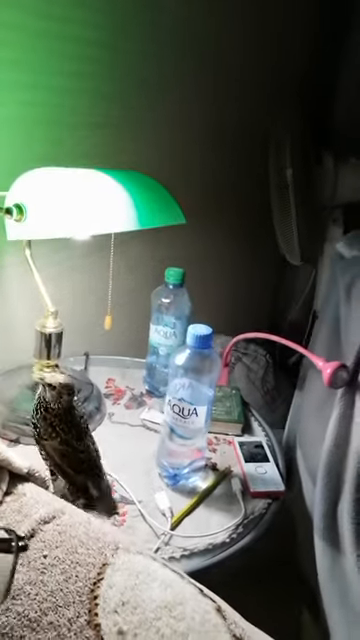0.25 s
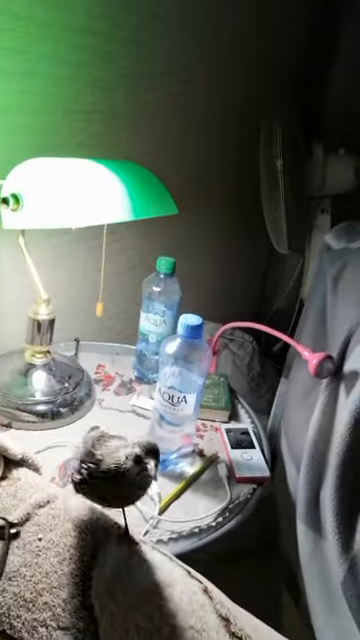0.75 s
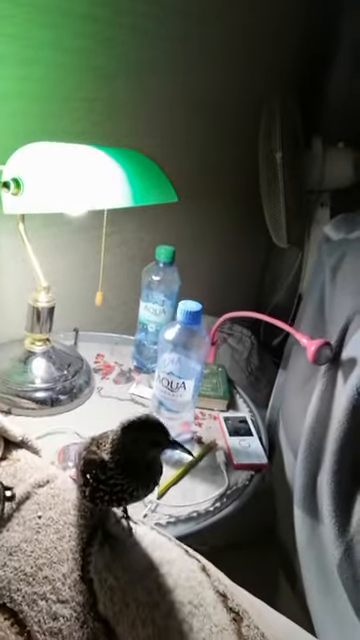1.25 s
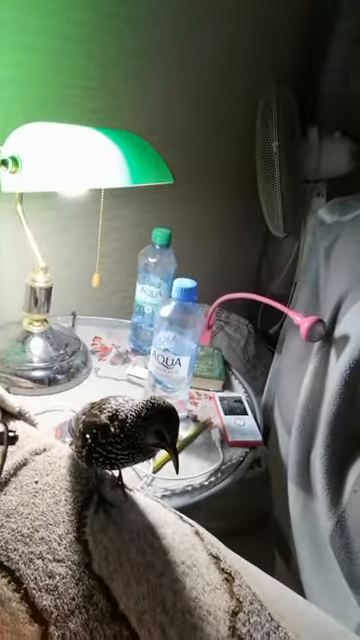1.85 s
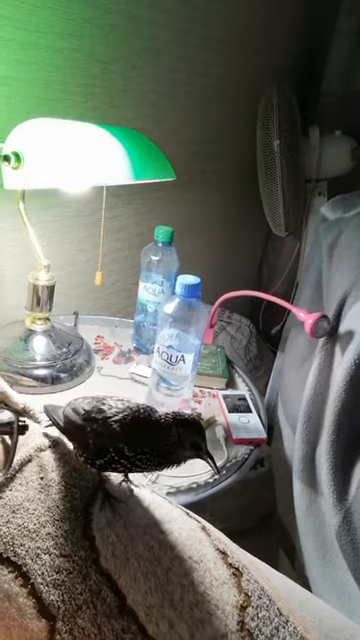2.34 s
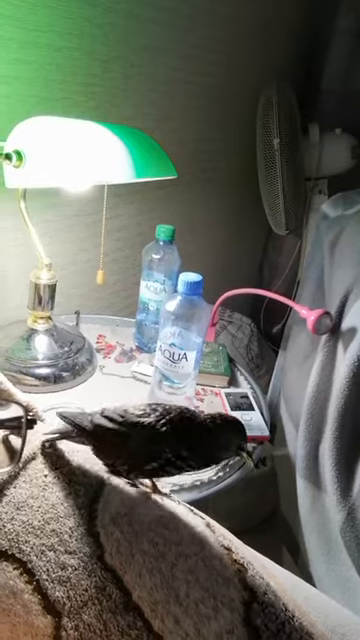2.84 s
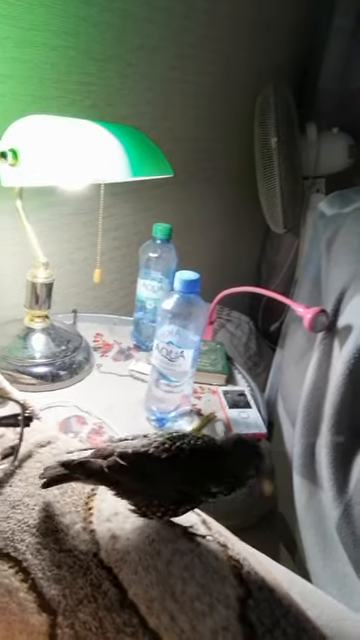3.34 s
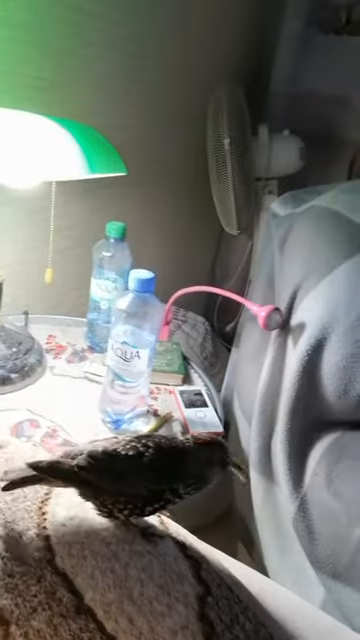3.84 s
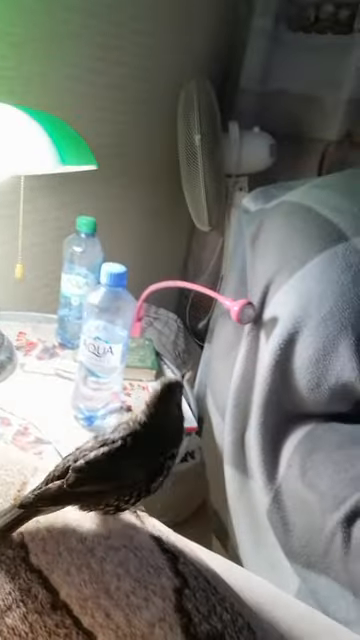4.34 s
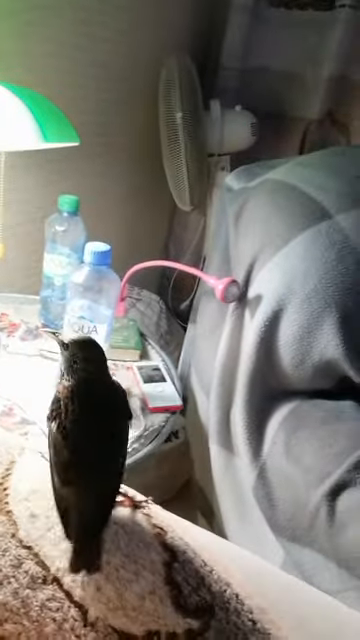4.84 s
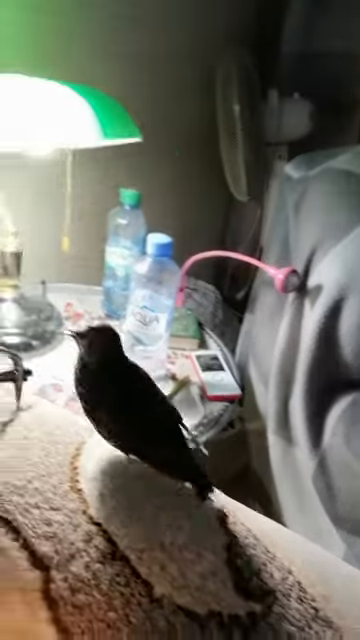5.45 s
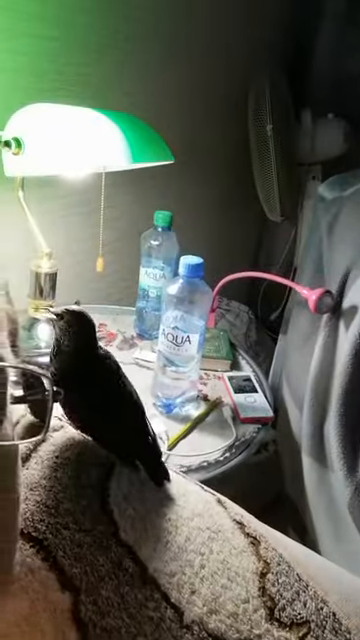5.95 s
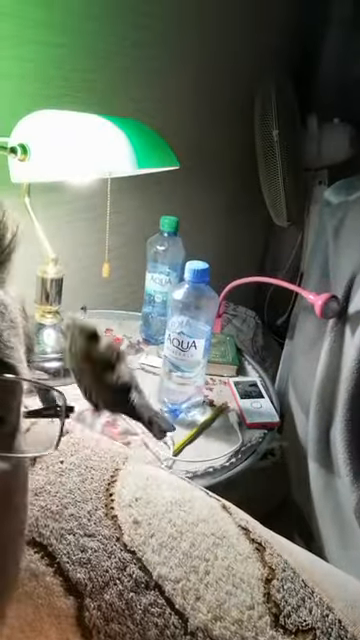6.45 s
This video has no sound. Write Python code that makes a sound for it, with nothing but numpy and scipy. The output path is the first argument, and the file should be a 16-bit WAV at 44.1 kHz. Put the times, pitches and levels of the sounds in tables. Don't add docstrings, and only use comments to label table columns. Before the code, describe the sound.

A starling sings very close to a phone in a small furnished bedroom. A quick train of falling clicky chirps opens, followed by hissy, wheezy breaths. Two clear whistles slide down and sag, then a rattle of rising chirps leads into a fast jumble of slurs, pips, squeaks and brief buzzes. Another faint chirp train comes later, and the end thins to airy wheeze. Short room reverberation, with soft fan rush and hum behind; the bird sounds stronger on the left.

```python
import sys
import numpy as np
from scipy import signal
from scipy.fft import rfft, irfft, next_fast_len
from scipy.io import wavfile
from scipy.ndimage import uniform_filter1d, map_coordinates

SR = 44100
rng = np.random.default_rng(int(sys.argv[2]) if len(sys.argv) > 2 else 0)


def convert_level_to_amplitude(level_db):
    exponent = np.asarray(level_db, float) / 20
    return 10 ** exponent


def inscribe(sig):
    pcm = np.round(np.clip(np.atleast_2d(sig).T, -1, 1) * 32767)
    wavfile.write(sys.argv[1], SR, pcm.astype(np.int16))


N = 295459


def unit(x):
    return x / np.sqrt(np.mean(x ** 2, axis=-1, keepdims=True) + 1e-20)


def along(points, hz):
    f, v = np.transpose(points)
    return np.interp(np.log(hz + 1), np.log(f + 1), v)


def curves(rows):
    s, *columns = np.transpose(rows)
    t = np.arange(N) / SR
    return [np.interp(t, s, column) for column in columns]


def wobble(rate):
    return map_coordinates(rng.standard_normal(N // 20), [np.arange(N) * rate / SR])


def filtered(x, response):
    m = next_fast_len(N + SR // 2)
    spectrum = rfft(x, m) * response(np.fft.rfftfreq(m, 1 / SR))
    return irfft(spectrum, m)[..., :N]


def resonant(x, modes):
    def response(f):
        total = 0
        for k, (centre, width, db) in enumerate(modes):
            damping = 1j * f * width
            total = total + (-1) ** k * convert_level_to_amplitude(db / 2) * damping / (centre ** 2 - f ** 2 + damping)
        return total ** 2
    return filtered(x, response)


def patchy(depth_db):
    z = signal.stft(rng.standard_normal(N + 512), nperseg=256)[2]
    field = uniform_filter1d(rng.standard_normal(z.shape), 2, 0)
    field = uniform_filter1d(field, 14, 1)
    return signal.istft(z * convert_level_to_amplitude(depth_db * field / field.std()), nperseg=256)[1][:N]


def song():
    out = np.zeros(N)
    rough = np.where(np.arange(N) < 2 * SR, .35, 1)
    waver = 1 + .009 * rough * wobble(150)
    flutter = np.clip(1 + .15 * wobble(35) + .4 * rough * wobble(170), .25, 1.4)
    for note in whistles() + strokes() + pips():
        brief = note[-1][0] - note[0][0] < .024
        add(out, note, .0012, waver, convert_level_to_amplitude(6.5) * (np.ones(N) if brief else flutter), 0)
    knocks = chirps(out, waver)
    hoarse(out, waver)
    return out + knocks


# f/Hz, level/dB
OVERTONE_LEVELS = [(1500, -16), (3000, 9.5), (5600, -39), (8300, -7.5), (10500, -29), (14000, -68)]


def add(out, rows, edge, waver, flutter, rich_db):
    s, hz, db = np.transpose(rows)
    at = np.arange(round((s[0] - edge) * SR), min(round((s[-1] + edge) * SR), N))
    t = at / SR
    pitch = uniform_filter1d(np.interp(t, s, hz), size=70) * waver[at]
    phase = 2 * np.pi * np.cumsum(pitch) / SR
    second = convert_level_to_amplitude(along(OVERTONE_LEVELS, 2 * pitch) + rich_db) * np.sin(2 * phase)
    third = convert_level_to_amplitude(along(OVERTONE_LEVELS, 3 * pitch) + rich_db - 35) * np.sin(3 * phase)
    ramp = np.clip(np.minimum(t - t[0], t[-1] - t) / (2 * edge), 0, 1)
    gain = convert_level_to_amplitude(np.interp(t, s, db)) * flutter[at] * np.sin(np.pi / 2 * ramp) ** 2
    out[at] += gain * (np.sin(phase) + second + third)


# t/s, length/s, f/Hz, level/dB
WHISTLES = [
    (1.344, .176, 2793, -21),
    (1.665, 0.22, 2739, -19.5),
]


def whistles():
    from_hz, slide_s, slide_db = 3340, 0.051, -17
    sag_hz_per_s, wane_db_per_s = 459, 48.5
    notes = []
    for s, length, hz, db in WHISTLES:
        notes.append([
            (s, from_hz, db + slide_db),
            (s + 0.28 * slide_s, 0.39 * from_hz + .6 * hz, db - 8.5),
            (s + slide_s, hz, db),
            (s + length, hz - sag_hz_per_s * length, db - wane_db_per_s * length)])
    return notes


# t/s, length/s, start f/Hz, end f/Hz, level/dB
DROPS = [(2.367, .018, 1345, 646, -35.5), (2.488, 0.028, 6460, 3840, -39), (2.752, 0.017, 4500, 1984, -24),
         (2.846, 0.019, 3490, 2257, -23), (3.086, .014, 3030, 1765, -36), (3.119, 0.0088, 3620, 2460, -28),
         (3.284, 0.021, 4510, 3090, -30), (3.318, 0.0084, 3870, 3380, -22), (3.36, .015, 3304, 2365, -25),
         (3.886, 0.015, 5760, 4600, -30), (3.903, 0.0081, 5060, 4170, -25.5),
         (3.929, 0.014, 4570, 2350, -28), (3.946, 0.0094, 3140, 1675, -30), (4.272, .016, 3640, 1867, -31),
         (4.392, .006, 3100, 2450, -26), (5.138, 0.02, 6140, 4090, -28.5), (5.18, 0.0086, 3440, 2360, -27),
         (5.2, .016, 3068, 1715, -42.5), (5.284, .016, 3370, 2780, -25.5),
         (5.654, 0.0064, 1525, 870, -44.5), (5.792, 0.0052, 3550, 2510, -24.5),
         (5.808, 0.0046, 3120, 2200, -27.5)]
CLIMBS = [(2.385, .033, 648, 1100, -37), (2.415, 0.016, 7170, 7900, -33), (2.513, 0.017, 3820, 4230, -30),
          (2.551, 0.032, 3710, 3870, -23), (2.736, 0.023, 3900, 4660, -45),
          (2.772, 0.017, 1960, 2874, -23.5), (2.805, 0.013, 3010, 3860, -27.5),
          (2.862, 0.033, 2270, 2884, -27), (3.127, 0.035, 2400, 3500, -26.5),
          (3.176, 0.024, 3980, 4300, -41), (3.201, 0.036, 2420, 2893, -24.5),
          (3.303, 0.012, 3160, 3900, -28), (3.375, .02, 2412, 2880, -26.5), (3.912, 0.021, 4140, 4560, -31),
          (3.941, 0.0063, 2410, 3140, -17), (3.962, 0.036, 2804, 3400, -24.5),
          (4.29, .047, 2450, 3440, -23.5), (4.411, 0.016, 2514, 3440, -29.5),
          (5.19, .006, 2350, 3330, -20.5), (5.216, 0.045, 1920, 3580, -20), (5.827, .033, 2490, 3334, -23),
          (5.66, 0.033, 872, 1100, -45)]
HOLDS = [(1.523, 0.04, 2957, 2880, -31.5), (2.429, 0.056, 7830, 6350, -36.5),
         (2.43, 0.027, 1223, 1350, -43), (2.533, 0.022, 4200, 3750, -29), (2.788, 0.017, 2873, 3040, -16),
         (2.821, .078, 2066, 2093, -35.5), (3.166, 0.025, 2020, 1930, -40.5),
         (3.324, 0.024, 3340, 3377, -22.5), (3.338, .033, 1975, 1834, -39.5),
         (3.395, 0.026, 2906, 2580, -27.5), (4.001, 0.022, 3400, 3274, -24),
         (4.009, 0.029, 2350, 2200, -33.5), (4.041, .064, 2793, 2430, -34), (4.337, .027, 3435, 3364, -25),
         (4.354, 0.018, 2097, 2123, -30.5), (4.398, 0.015, 2430, 2530, -25.5),
         (5.157, 0.034, 4020, 4240, -28), (5.273, 0.029, 1965, 2030, -44.5), (5.615, .036, 3030, 2500, -41),
         (5.754, 0.037, 3920, 4220, -39), (5.812, 0.02, 2200, 2020, -32.5),
         (5.866, 0.063, 3230, 2736, -34.5)]
# share of the glide done at half time, level/dB at start, middle, end
DROP, CLIMB, HOLD = (.65, -3, 0, -4.5), (0.61, -8.5, -2, 0.5), (0.64, 0.5, -4, -8.5)


def strokes():
    notes = []
    for rows, (done, start_db, mid_db, end_db) in [(DROPS, DROP), (CLIMBS, CLIMB), (HOLDS, HOLD)]:
        for s, length, from_hz, to_hz, db in rows:
            mid_hz = from_hz + done * (to_hz - from_hz)
            notes.append([(s, from_hz, db + start_db), (s + length / 2, mid_hz, db + mid_db),
                          (s + length, to_hz, db + end_db)])
    return notes


# t/s, length/s, f/Hz, level/dB
PIPS = [(2.146, 0.0071, 1360, -42.5), (2.161, 0.012, 880, -34.5), (2.192, .012, 2640, -30),
        (2.21, .011, 1293, -45), (2.242, 0.012, 2715, -24.5), (2.252, 0.016, 764, -35),
        (2.292, 0.013, 2740, -17.5), (3.995, .005, 4200, -28.5), (4.143, 0.016, 2115, -32),
        (4.263, .011, 5400, -32.5), (5.794, 0.037, 940, -46.5)]


def pips():
    sag, fade_db = 0.928, -20.5
    return [[(s, hz, db), (s + length, hz * sag, db + fade_db)] for s, length, hz, db in PIPS]


# t/s, peak level/dB, low end f/Hz
FALLING = [(0.035, -22, 2200), (0.072, -22, 2220), (0.109, -23, 2200), (.143, -23, 2200),
           (0.181, -22, 2280), (0.221, -26.5, 1750), (0.258, -28, 1360), (0.292, -41, 1200)]
RISING = [(1.974, -21.5, 1780), (2.003, -15, 2200), (2.026, -21.5, 2060), (2.049, -29, 1580),
          (2.074, -31, 1710), (2.096, -42, 1350), (2.119, -32.5, 2200), (4.806, -41, 2630),
          (4.842, -30.5, 2680), (4.875, -30, 2700), (4.904, -27, 2820), (4.934, -26.5, 2740),
          (4.969, -34, 2900), (5.401, -18, 3140)]
# f/Hz, width/Hz, level/dB
CHEST = [(302, 220, 1), (1100, 620, 2)]


def chirps(out, waver):
    blows = np.zeros(N)
    fall_top_hz, fall_hz_per_s = 3300, 194000
    for s, db, low_hz in FALLING:
        end = s + (fall_top_hz - low_hz) / fall_hz_per_s
        sweep = [(s + 0.001034, fall_top_hz, db), (end, low_hz, db - 21)]
        add(out, sweep, .002, waver, convert_level_to_amplitude(8.5) * np.ones(N), -12)
        blows[round((s + .008) * SR)] = convert_level_to_amplitude(db + 7.0)
    rise_top_hz, rise_hz_per_s = 4850, 323000
    for s, db, low_hz in RISING:
        end = s + (rise_top_hz - low_hz) / rise_hz_per_s
        sweep = [(s + 0.00194, low_hz, db), (end, rise_top_hz, db - 21.5)]
        add(out, sweep, .002, waver, convert_level_to_amplitude(1.5) * np.ones(N), -12)
        blows[round(s * SR)] = convert_level_to_amplitude(db - 6.0)
    return resonant(blows, CHEST)


# start t/s, end t/s, start f/Hz, end f/Hz, level/dB
HOARSE = [(0.204, 0.241, 3200, 3250, -23), (0.314, 0.415, 3280, 3930, -36), (.69, 0.884, 3484, 3200, -37),
          (1.245, 1.297, 7030, 7600, -43.5), (1.362, 1.483, 6030, 6310, -42),
          (6.34, 6.704, 4420, 4220, -44)]


def hoarse(out, waver):
    rasp = wobble(140)
    for start, end, from_hz, to_hz, db in HOARSE:
        add(out, [(start, from_hz, db), (end, to_hz, db + 0.5)], .008, waver, rasp, -30)


# start t/s, end t/s, start f/Hz, end f/Hz, beat f/Hz, level/dB
BUZZES = [(2.582, 2.64, 4350, 4720, 140, -31.5), (2.92, 3, 2617, 3630, 206, -35.5),
          (3.42, 3.5, 2902, 2893, 142, -35), (4.115, 4.164, 2392, 2565, 200, -34.5),
          (4.437, 4.521, 2754, 3040, 190, -42), (5.948, 6.038, 2995, 3096, 153, -38)]
# f/Hz, level/dB
RATTLE = [(2500, 0), (4500, 13), (6300, 6), (8500, -1.5), (10500, -5), (14000, -39)]


def buzzes():
    out, chop = np.zeros(N), np.ones(N)
    drift, tremor = wobble(40), wobble(500)
    size = convert_level_to_amplitude(1.3 * wobble(190))
    for start, end, from_hz, to_hz, rate, db in BUZZES:
        at = np.arange(round(start * SR), round(end * SR))
        t = at / SR
        on = np.clip(np.minimum((t - start) / .002, (end - t) / 0.023), 0, 1)
        turns = np.pi * np.cumsum(rate * (1 + 0.077 * drift[at])) / SR
        beat = np.sin(turns) ** 2 * size[at]
        zigzag = 1 - 0.07 * np.sin(2 * turns) + 0.0397 * tremor[at]
        pitch = np.interp(t, [start, end], [from_hz, to_hz]) * zigzag
        phase = 2 * np.pi * np.cumsum(pitch) / SR
        tone = sum(convert_level_to_amplitude(along(RATTLE, k * pitch)) * np.sin(k * phase) for k in range(1, 5))
        out[at] += on * convert_level_to_amplitude(db + 3) * beat * tone
        chop[at] *= 1 + on * .6 * (2.2 * beat - 1)
    puffs = resonant(np.abs(out) * rng.standard_normal(N), CHEST)
    return out + convert_level_to_amplitude(-24) * puffs, chop


# f/Hz, width/Hz, level/dB
CAVITY = [(8150, 1290, 10.5), (10340, 1130, 3.5), (11910, 2720, -6)]
PIPE = [(2200, 1087, -8), (3200, 880, 7.5), (4130, 1490, -1)]


def wheeze():
    (beak_gain, cavity_gain, pipe_gain), beak_hz = airflow()
    beak = beak_gain * unit(gliding(beak_hz, width_hz=232, skirt_db=0.0))
    cavity = cavity_gain * unit(resonant(patchy(6.55), CAVITY))
    pipe = pipe_gain * unit(resonant(patchy(7.1), PIPE))
    return (beak + cavity + pipe) * convert_level_to_amplitude(0.96 * wobble(60))


def gliding(centre_hz, width_hz, skirt_db):
    hz, t, z = signal.stft(patchy(5.4), SR, nperseg=256)
    off = (hz[:, None] - np.interp(t, np.arange(N) / SR, centre_hz)) / width_hz
    peak = 1 / (1 + off ** 2)
    skirt = convert_level_to_amplitude(skirt_db) / (1 + (off / 5.87) ** 6)
    return signal.istft(z * (peak + skirt), SR, nperseg=256)[1][:N]


# t/s, beak level/dB, beak resonance f/Hz
LEAK = [(0, -33.5, 6060), (.3, -44, 5350), (1.1, -61, 4880), (1.75, -53, 6130), (2.0, -76, 5730),
        (2.6, -46, 4710), (2.92, -49, 6620), (3.1, -47, 5070), (3.55, -41.5, 6150), (4.1, -44, 6180),
        (5.15, -45.5, 5910), (5.45, -47, 5480), (5.8, -43.5, 6200), (6.7, -52.5, 5940)]
# t/s, stretch of the decay, beak level/dB, cavity level/dB, pipe level/dB
PUFFS = [(0.434, 0.92, -35.5, -38.5, -46), (.55, 0.79, -38, -41, -41), (.68, 3.05, -45.5, -45, -41),
         (0.944, 0.64, -30, -33, -40.5), (1.055, 0.47, -36, -40.5, -48), (1.26, 1.1, -60.5, -53.5, -52),
         (1.47, 1.9, -38.5, -43, -37.5), (2.059, 1.7, -38, -39.5, -38), (2.419, 1.4, -45, -42.5, -35.5),
         (2.6, 1.02, -31, -33, -70), (3.072, 1.3, -34, -40, -40.5), (4.122, 0.73, -26, -29, -30.5),
         (4.445, 0.82, -27, -26.5, -35.5), (5.171, 1.1, -54, -32, -65), (5.768, 1.6, -48, -36, -57),
         (5.961, 1.5, -33, -32.5, -37.5)]
# peak t/s, time to lose 10 dB t/s, beak level/dB, cavity level/dB, pipe level/dB
SWELLS = [(.19, .1, -35, -36, -37), (0.288, 0.0768, -31.5, -37, -34), (1.602, 0.11, -35, -44, -38.5),
          (1.749, 0.11, -39, -45, -39), (2.19, .1, -40.5, -53, -43), (2.341, 0.28, -48, -47, -36),
          (2.95, 0.06, -30.5, -41, -41), (3.21, 0.12, -63, -39, -39), (3.28, 0.1457, -32.5, -38, -41.5),
          (3.45, 0.12, -48, -40, -36), (4.42, 0.04, -44, -42.5, -34.5), (4.941, 0.17, -39.5, -44, -49.5),
          (5.249, 0.0357, -42, -36, -61), (5.409, 0.1647, -33.5, -45, -50), (5.66, 0.01, -38.5, -41, -37),
          (5.93, 0, -49, -58, -30.5), (6.028, 0.01, -30.5, -35, -38), (6.269, 0.09, -35, -49.5, -49)]


def airflow():
    t = np.arange(0, N + 100, 50) / SR
    rise_s, fade_db_per_s = 0.016, (111, 172, 139.5)
    leak_db, beak_hz = curves(LEAK)
    power = np.zeros((3, len(t)))
    for s, stretch, *db in PUFFS:
        fade_db = np.outer(fade_db_per_s, np.clip(t - s, 0, None)) / stretch
        rise = np.clip(1 + (t - s) / rise_s, 0, 1) ** 2
        power += (convert_level_to_amplitude(np.c_[db] - fade_db) * rise) ** 2
    for s, width, *db in SWELLS:
        power += convert_level_to_amplitude(np.c_[db] - 10 * np.abs(t - s) / width) ** 2
    bursts = np.array([np.interp(np.arange(N) / SR, t, p) for p in power])
    leak = convert_level_to_amplitude(leak_db + np.c_[[0, -6.5, -6]])
    return np.sqrt(bursts + leak ** 2), beak_hz


# t/s, level/dB
FACING = [(0, -5.5), (2, -6), (3.3, 0), (5.7, -2.5), (6.7, -1)]
# f/Hz, level/dB
SHADOW = [(100, 1), (700, -9), (1500, 10), (2500, -10), (4500, -10), (6500, -17.5), (8200, -41),
          (14000, -13.5)]


def shadowed(notes, air, reverberation):
    facing = convert_level_to_amplitude(curves(FACING)[0])
    behind = facing * (notes + convert_level_to_amplitude(-7.5) * air + convert_level_to_amplitude(-3.5) * reverberation)
    delay_s = 0.00011
    return filtered(behind, lambda hz: convert_level_to_amplitude(along(SHADOW, hz)) * np.exp(-2j * np.pi * hz * delay_s))


# f/Hz, t60 t/s
DECAY_TIMES = [(500, 0.24), (3000, 0.19), (10000, 0.18)]


def walls(x):
    hz, t, z = signal.stft(rng.standard_normal((2, SR // 3)), SR, nperseg=128)
    decay = convert_level_to_amplitude(-60 * t / along(DECAY_TIMES, hz)[:, None])
    tail = unit(signal.istft(z * decay, SR, nperseg=128)[1])
    late = np.pad(x, (200, 0))[None]
    return signal.fftconvolve(late, tail / np.sqrt(tail.shape[1]), axes=1)[:, :N]


# f/Hz, level/dB per Hz
RUSH_SPECTRUM = [(20, 1.5), (90, -5.5), (160, -10.5), (400, -15.5), (1200, -18.5), (3000, -29), (7000, -39),
                 (15000, -32.5), (15800, -48)]
# t/s, level/dB
STIR = [(0, -62), (4.5, -67), (4.9, -65.5), (6.1, -64), (6.7, -58)]
# t/s, level/dB
MOTOR = [(0, -82), (.7, -73), (2.4, -70), (2.55, -79)]


def room_tone():
    noise = np.array([patchy(3.96) for _ in range(3)])
    shared, left, right = filtered(noise, lambda hz: convert_level_to_amplitude(along(RUSH_SPECTRUM, hz)))
    ports = np.array([shared + 2.4 * left, shared + 1.06 * right])
    rush = convert_level_to_amplitude(curves(STIR)[0] + 2.0) * unit(ports)
    motor = np.sin(2 * np.pi * np.cumsum(198 + 0.86 * wobble(8)) / SR)
    return rush + convert_level_to_amplitude(curves(MOTOR)[0]) * motor


def scene():
    buzz, chop = buzzes()
    notes = song() + buzz
    air = wheeze() * chop
    wet = walls(notes + 0.93 * air)
    left = notes + air + convert_level_to_amplitude(-8.0) * wet[0]
    right = shadowed(notes, air, wet[1])
    return np.array([left, right]) + room_tone()


def roll_off(x):
    return signal.sosfilt(signal.butter(12, 15970, fs=SR, output="sos"), x)


def record(dry):
    held = dry / (1 + np.abs(dry / .62) ** 4) ** (1 / 4)
    mix = filtered(held, lambda hz: 1 / (1 + (hz / 15300) ** 40))
    return roll_off(mix)


dry = scene()
out = record(dry)
inscribe(out)
```